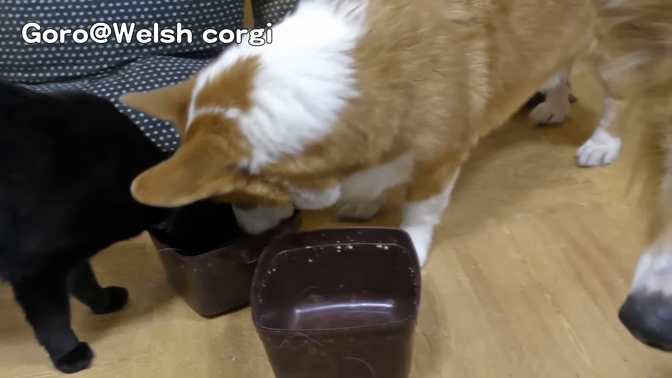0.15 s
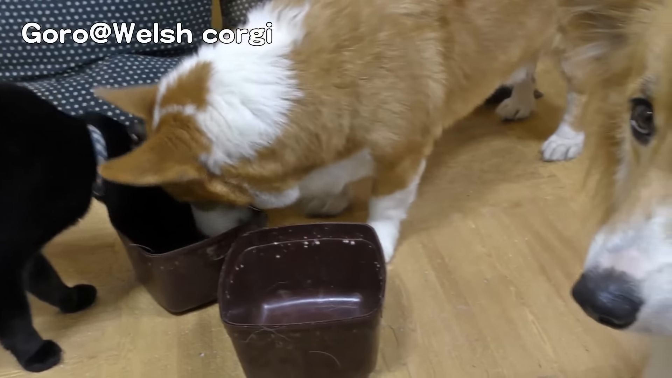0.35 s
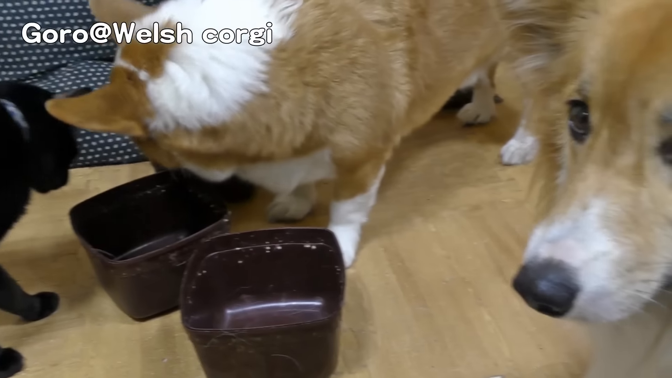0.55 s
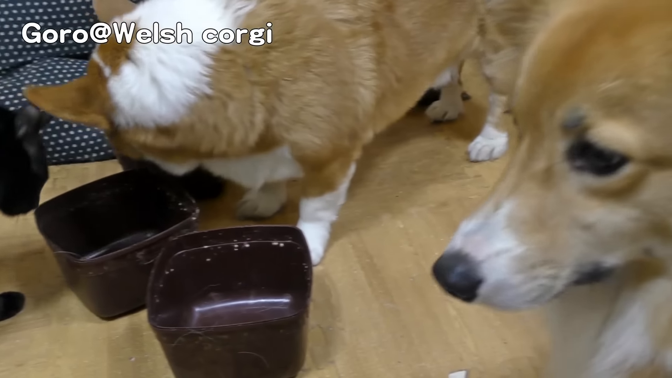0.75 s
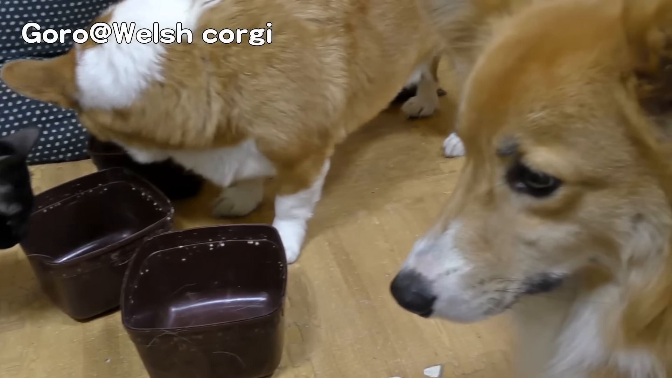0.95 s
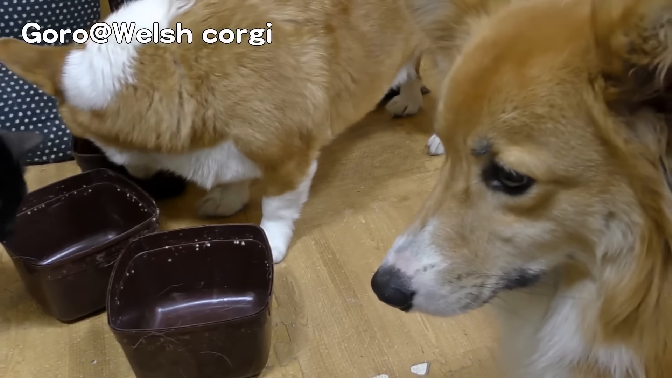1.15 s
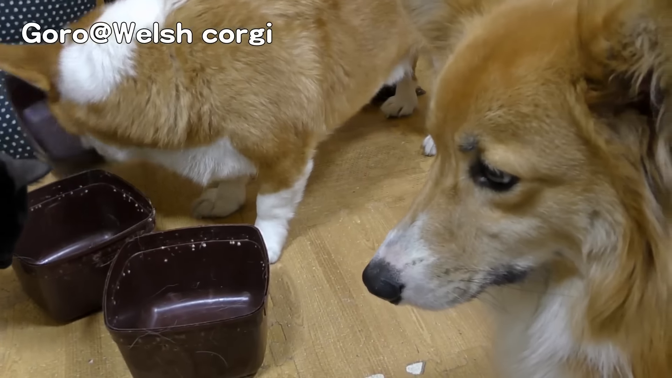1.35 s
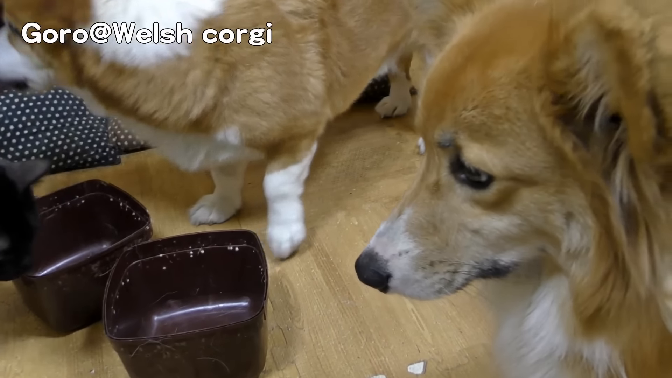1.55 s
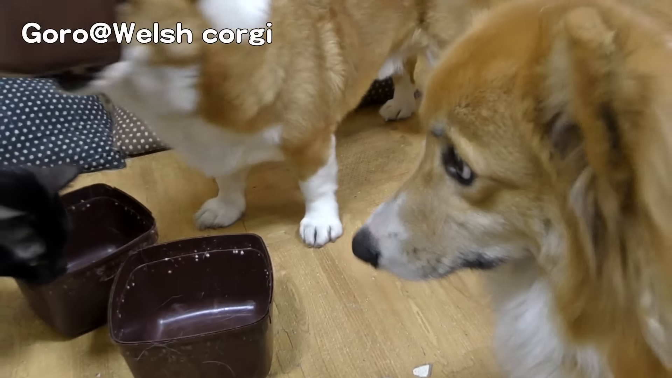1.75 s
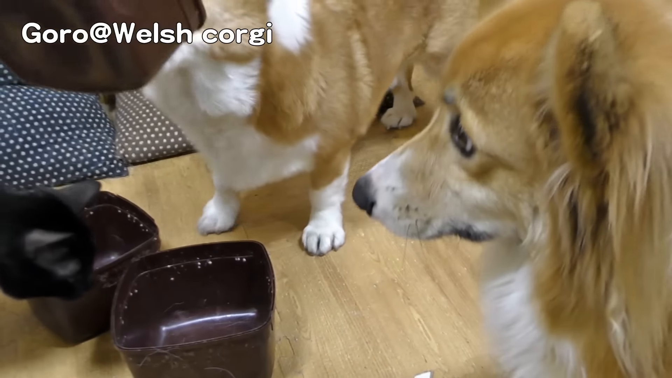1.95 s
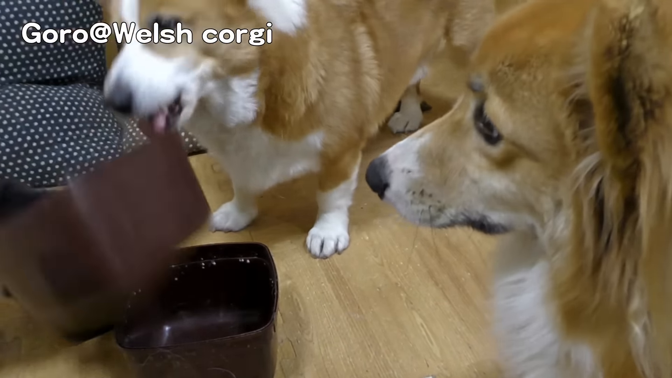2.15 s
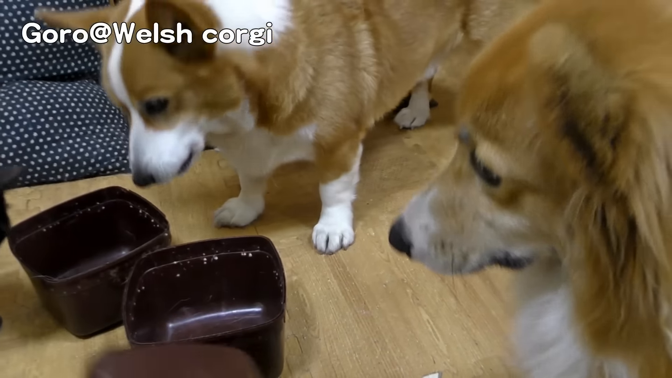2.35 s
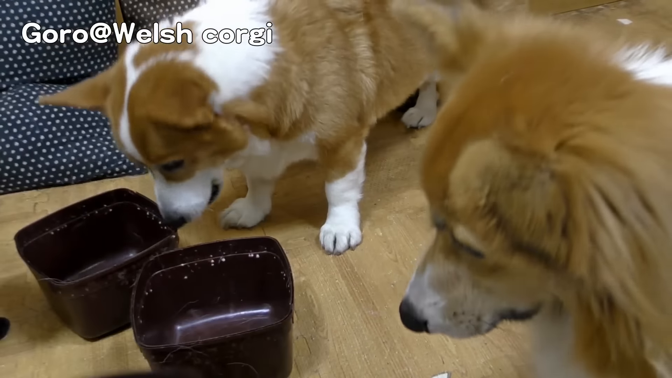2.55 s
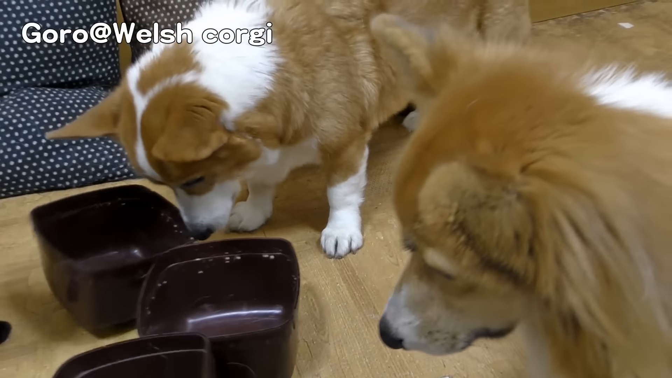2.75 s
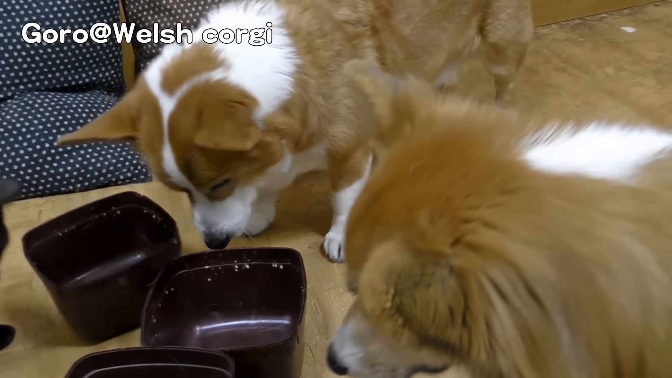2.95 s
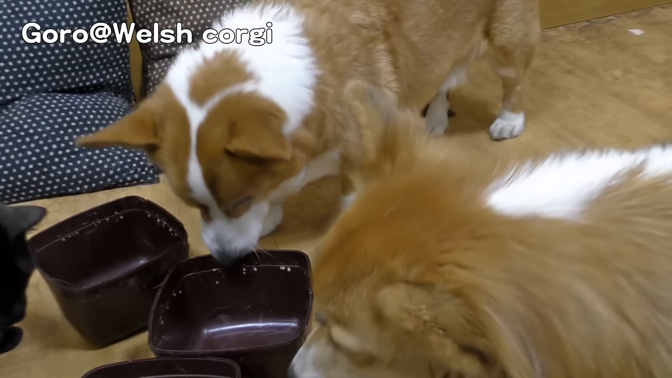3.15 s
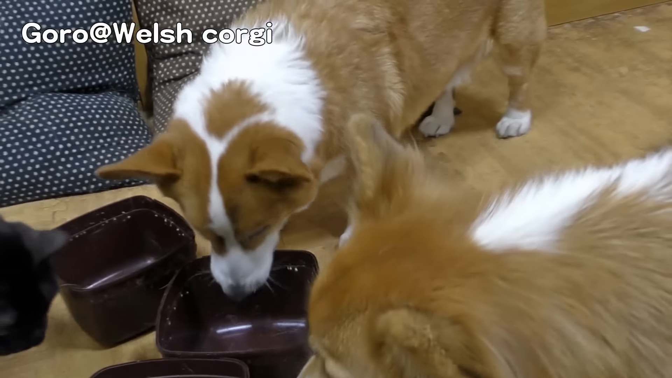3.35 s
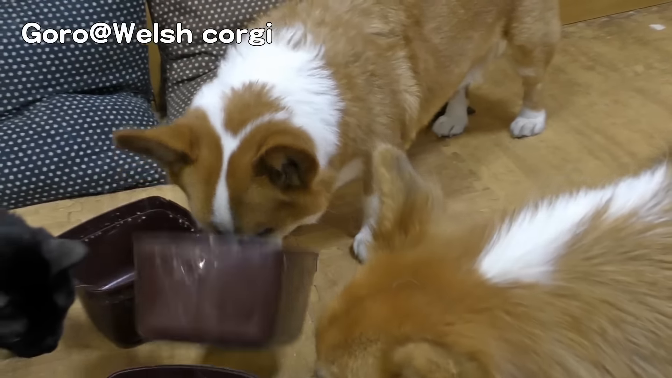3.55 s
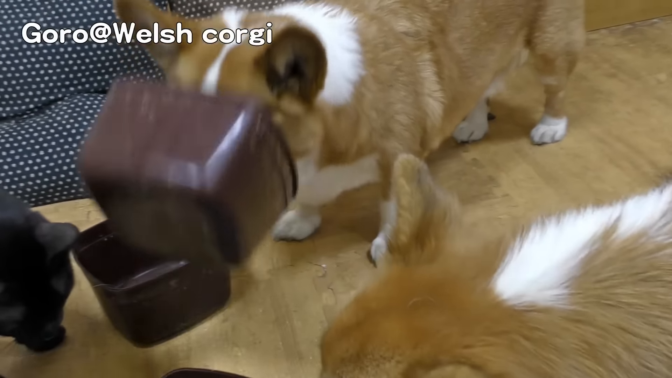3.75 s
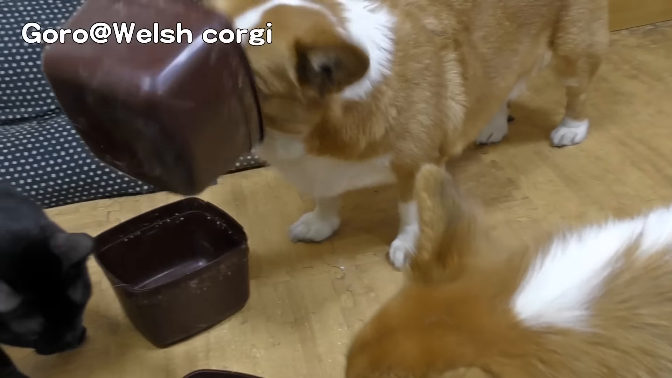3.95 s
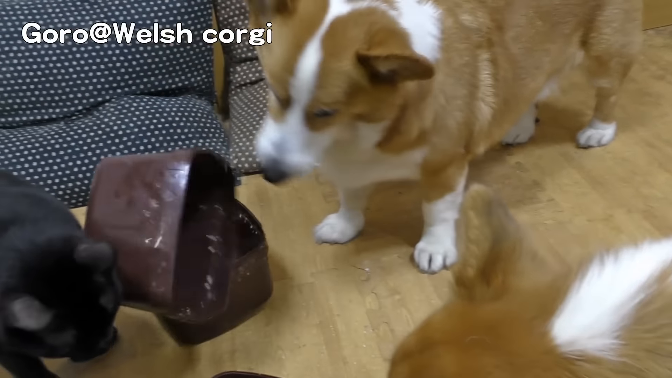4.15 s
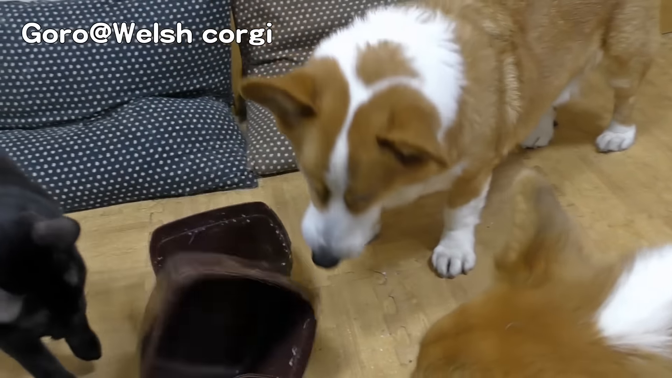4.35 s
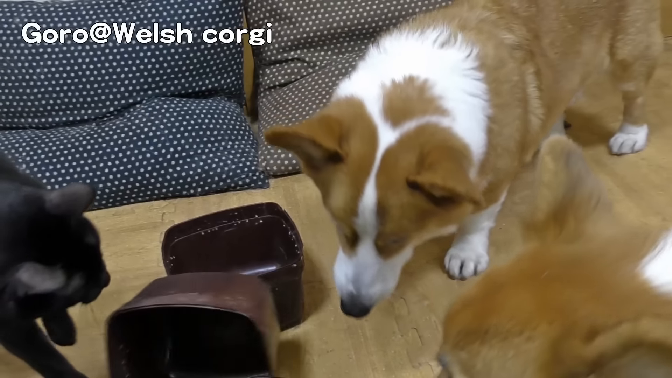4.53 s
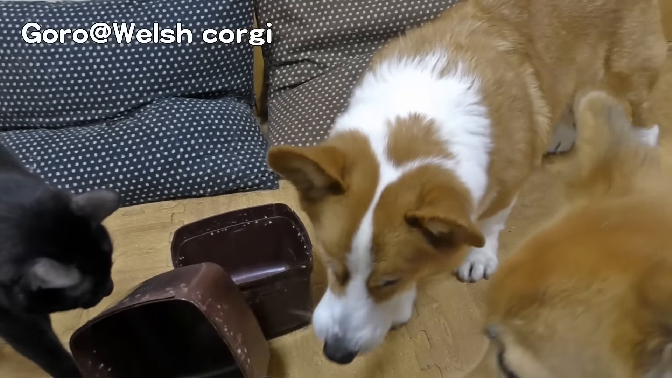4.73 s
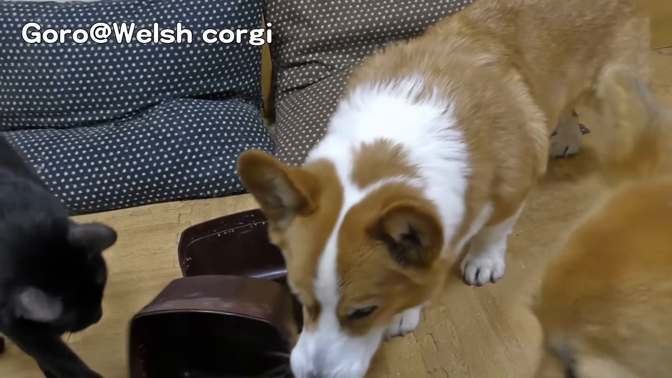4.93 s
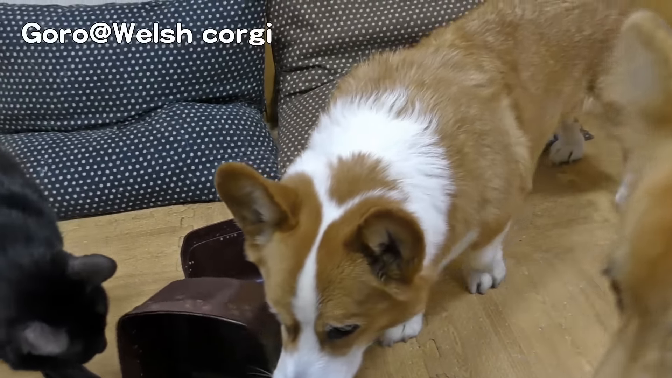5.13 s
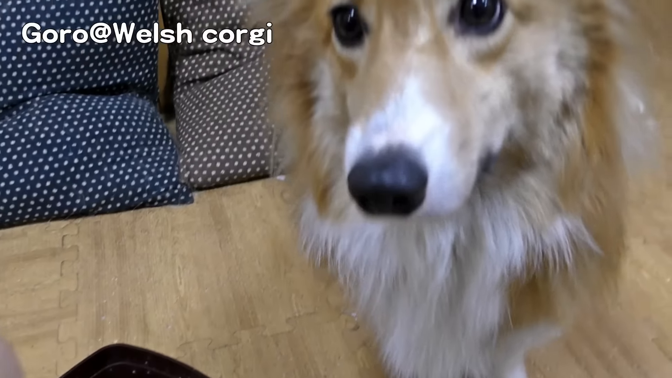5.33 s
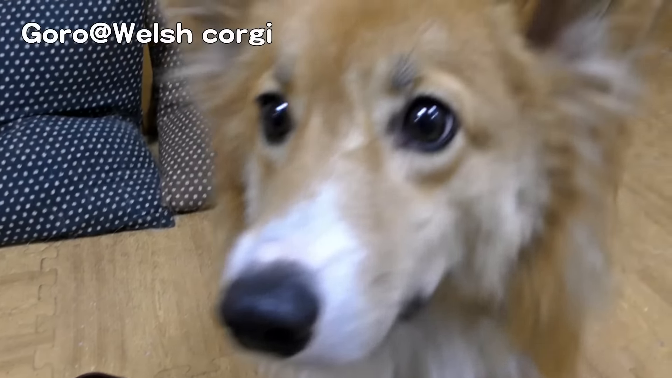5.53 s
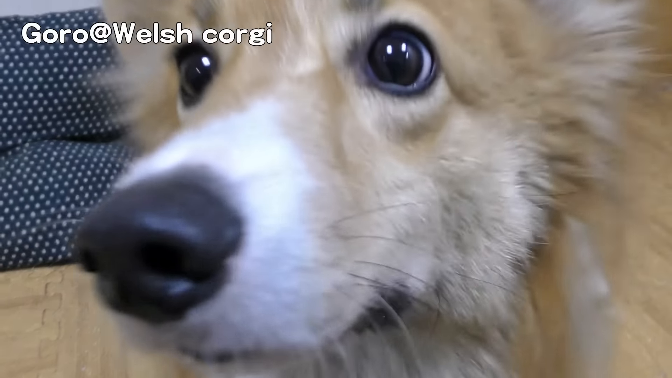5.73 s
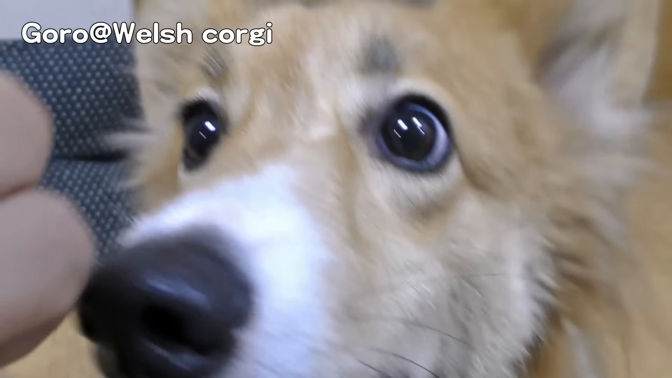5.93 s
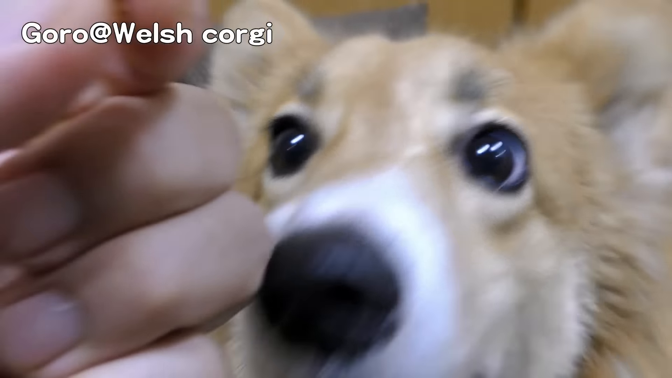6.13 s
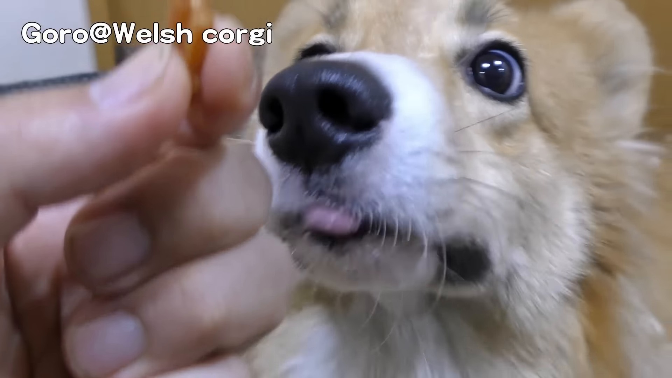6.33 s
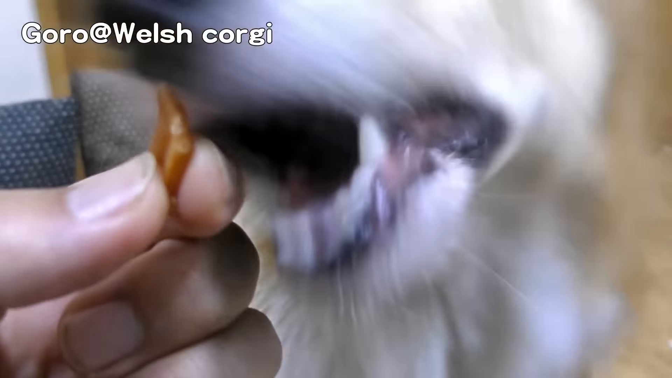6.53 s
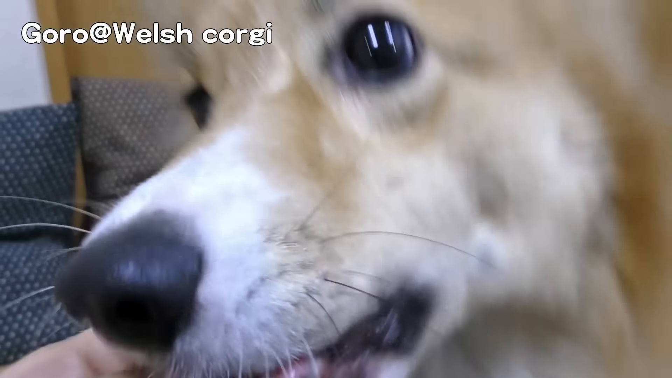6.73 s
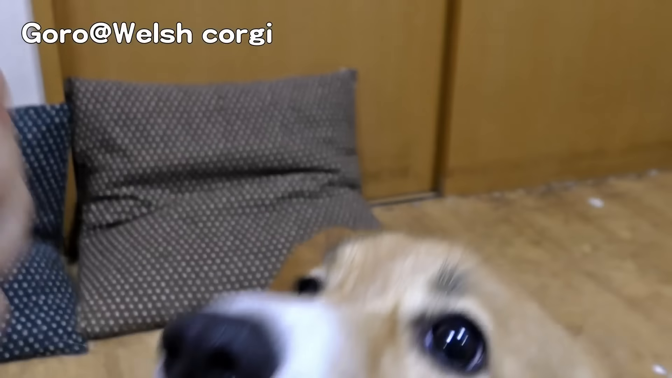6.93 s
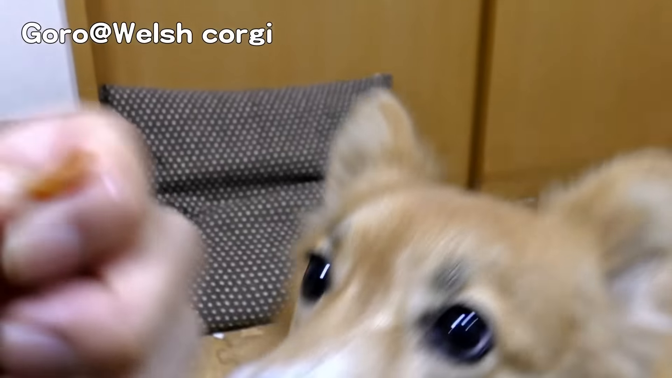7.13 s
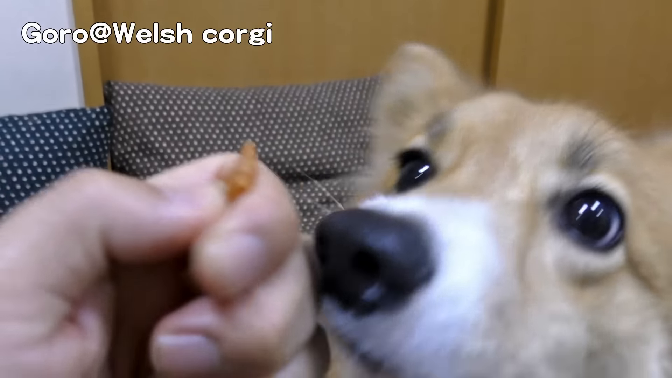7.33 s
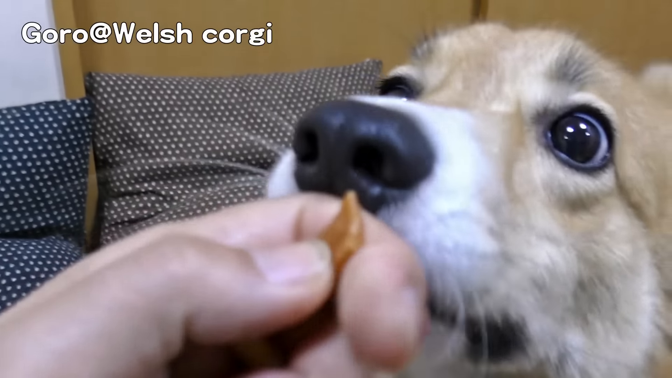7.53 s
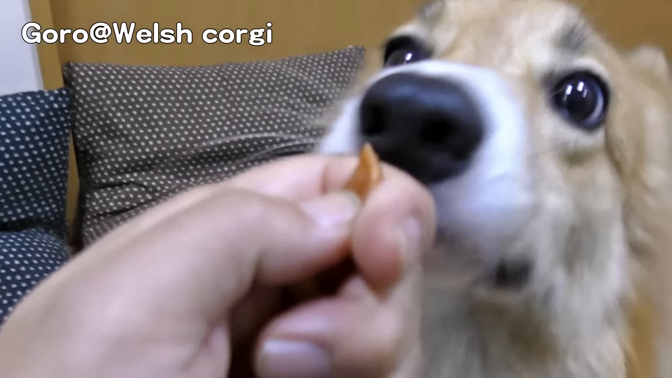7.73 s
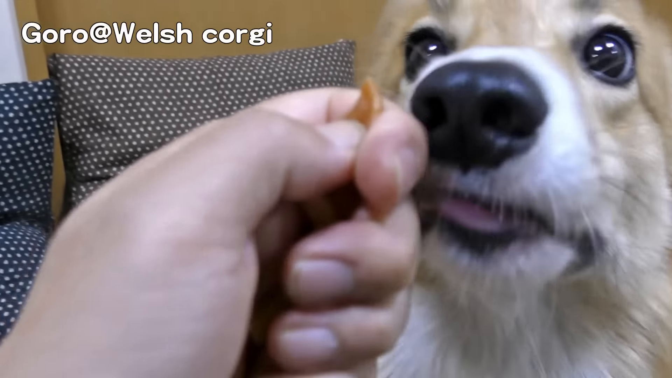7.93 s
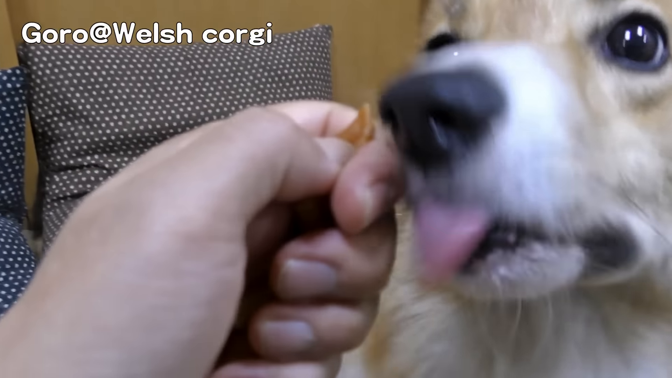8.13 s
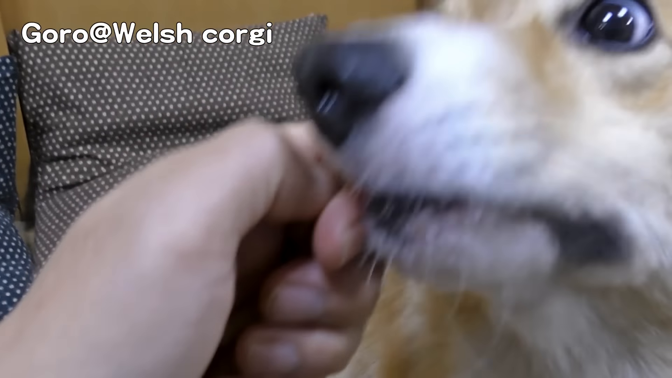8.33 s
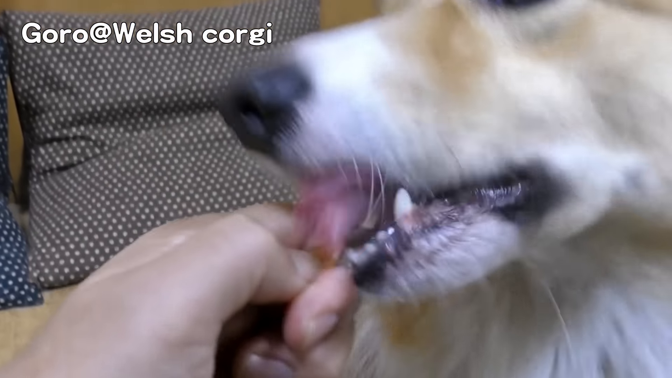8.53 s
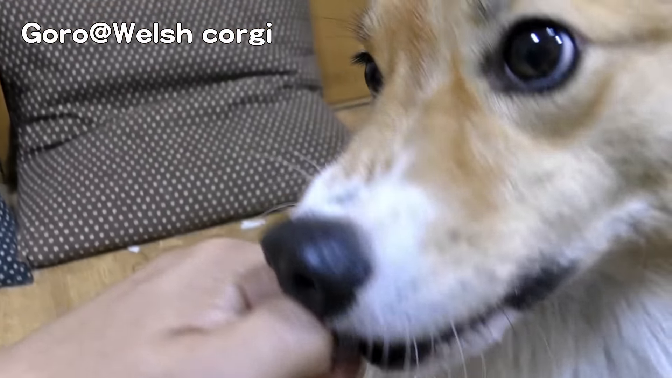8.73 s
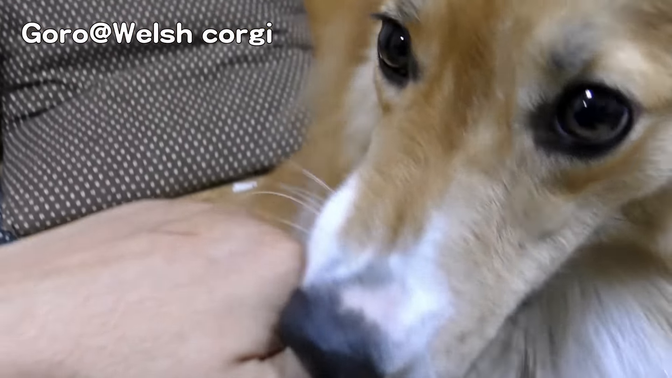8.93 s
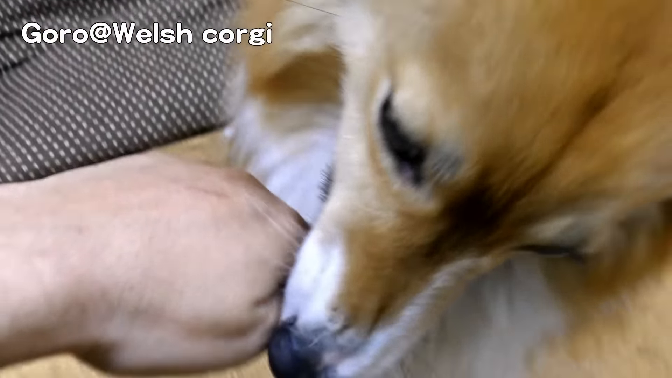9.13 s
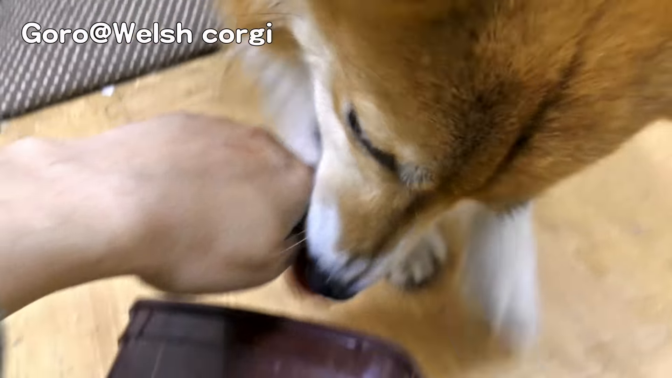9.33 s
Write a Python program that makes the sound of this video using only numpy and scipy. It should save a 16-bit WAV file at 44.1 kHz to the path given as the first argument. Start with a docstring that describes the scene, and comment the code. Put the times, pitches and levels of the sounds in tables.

```python
"""A soft indoor hum with faint hiss, then small clicks and puffs of air as dogs sniff about a small room.
They nose and tip hard plastic boxes on the floor, then take a treat right at the microphone.
Each knock is a short noise crack at the rim, with decaying sines for the thin walls and drum-like bottom.
Sliding boxes are trains of uneven slips, sniffs and fur are shaped noise, and paws are short low thumps.
Teeth, lips and tongues are brief cavity tones with bright ticks; filtered noise tails make the room."""
import sys
import numpy as np
from scipy import signal
from scipy.fft import rfft, irfft, next_fast_len
from scipy.io import wavfile

SR = 44100
rng = np.random.default_rng(int(sys.argv[2]) if len(sys.argv) > 2 else 0)


def to_wav(sig):
    """Store sig (one row per channel, or 1-D mono) as 16-bit WAV at the path in sys.argv[1].

    Samples outside -1..1 are clipped; the rate is SR.
    """
    pcm = np.clip(np.atleast_2d(sig), -1, 1) * 32767
    pcm = np.round(pcm).astype(np.int16)
    wavfile.write(sys.argv[1], SR, pcm.T)  # frames by channels


N = 413658  # samples in the scene
AGE = np.arange(SR // 3) / SR  # seconds since a blow; every struck sound and room tail ends here


def undb(db):
    """Turn decibels into an amplitude factor."""
    return 10 ** (np.asarray(db) / 20)


def level(x, db, span):
    """Scale a sound so that its energy, spread over span seconds, has this level in dB."""
    rms = np.sqrt(np.sum(x ** 2) / (span * SR) + 1e-18)
    return x * undb(db) / rms


def fade(t60):
    """Exponential decay after a blow, falling 60 dB in t60 seconds."""
    return np.exp(-np.log(1000) * AGE / t60)


def add(track, s, x):
    """Mix a sound into a track from time s in seconds."""
    i = int(s * SR)
    track[i:i + len(x)] += x[:N - i]


def band(x, hz, ratio, order=1):
    """Band-pass from hz / ratio to hz * ratio, kept below the top of the sampled range."""
    edges = [hz / ratio, min(hz * ratio, .47 * SR)]
    return signal.sosfilt(signal.butter(order, edges, "band", fs=SR, output="sos"), x)


def highpass(x, hz, order=2):
    """Remove what lies below hz."""
    return signal.sosfilt(signal.butter(order, hz, "high", fs=SR, output="sos"), x)


def noise(points, size):
    """Noise of rms 1, its spectrum drawn through (Hz, dB) points."""
    hz, db = np.transpose(points)
    n = next_fast_len(size)
    f = np.arange(n // 2 + 1) * SR / n
    gain = undb(np.interp(np.log(f + 1), np.log(hz), db))
    x = irfft(rfft(rng.standard_normal(n)) * gain, n)[:size]
    return x / x.std()


def walk(rate, size):
    """Random wander with a spread near 1: straight lines between rate random points per second."""
    steps = np.arange(size) * rate / SR
    count = int(steps[-1]) + 2
    return np.interp(steps, np.arange(count), rng.standard_normal(count))


def spread(mid, side, side_db):
    """Left and right from a common and an opposed part."""
    return mid + undb(side_db) * side * np.array([[1], [-1]])


def crack(t60, rise=0.0014):
    """A burst of contact noise; the surfaces take a moment to meet."""
    return rng.standard_normal(len(AGE)) * fade(t60) * (1 - fade(rise))


# Spectrum of fine contact noise. Each row: frequency in Hz, relative density in dB per Hz.
FINE = [(1500, -70), (4000, 1), (5800, -4.5), (7500, -4), (9800, -1.5), (12000, -5.5), (16000, -22.5)]


def tick(t60):
    """The very short, bright start of a contact."""
    return noise(FINE, len(AGE)) * fade(t60)


def radiated(hz, ratio):
    """A click summed over all directions, as the room hears it: one smooth broad hump."""
    return band(band(signal.unit_impulse(len(AGE)), hz, ratio), 1770, 3.0, order=2)


# Spectrum of the room's air noise. Each row: frequency in Hz, relative density in dB per Hz.
HUM = [(18, -74), (30, -13), (64, -11), (95, -6), (141, -0.5), (252, -11), (287, -9), (473, -17.5),
       (616, -26), (1350, -18.5), (1760, -20.5), (2540, -23), (5590, -38), (9220, -36), (16000, -36)]
HUM_DB = -56


def hum(wander_db=0.5, hiss_db=-74.0):
    """Nearly steady indoor air noise, with a faint independent hiss in each microphone."""
    common = noise(HUM, N) * undb(wander_db * walk(2.19, N))
    air = spread(common, noise(HUM, N), -7.5)
    return undb(HUM_DB) * air + undb(hiss_db) * rng.standard_normal((2, N))


# Fur and hands stirring near the microphone. Each row: time in seconds, rustle level in dB.
STIR = [(5.5, -81), (5.85, -57), (6.25, -61), (6.8, -53.5), (7.12, -64), (7.5, -63.5), (7.9, -58),
        (8.45, -63.5), (8.85, -66), (9.12, -51), (9.37, -56)]
# Spectrum of the fur rustle. Each row: frequency in Hz, relative density in dB per Hz.
FUR = [(150, -4), (400, 1.5), (650, -13), (1100, 0.5), (1700, -1), (3000, -3), (4200, -11), (6000, -28.5),
       (12000, -36)]
# Sniffs, brushing fur and scuffing feet. Each row: start in seconds, length in seconds, level in dB.
SNIFFS = [(.23, 0.068, -61), (1.5, 0.057, -62), (1.683, 0.077, -59), (4.79, 0.051, -54.5),
          (5.058, 0.09, -57), (5.171, 0.074, -56.5), (5.399, 0.053, -56), (5.619, 0.038, -48.5),
          (5.746, 0.047, -53), (5.904, 0.037, -47.5), (5.966, 0.058, -51), (6.361, 0.041, -49),
          (6.445, .05, -52.5), (6.53, 0.044, -45), (6.872, 0.11, -44.5), (7.202, 0.044, -46),
          (7.254, 0.059, -51), (8.295, .08, -55.5), (9.125, .077, -46.5)]
SNIFF_HISS_DB, STIR_HISS_DB = -10, -8  # fine hiss relative to the rustle


def sniffs(flutter_db=6.5, stir_flutter_db=5.0):
    """Short fluttering puffs of air, brushed fur and scuffs as shaped noise over a continuous stirring."""
    stir_db = np.interp(np.arange(N) / SR, *np.transpose(STIR))
    out = undb(stir_db + stir_flutter_db * walk(30, N)) * noise(FUR, N)
    out += undb(stir_db + STIR_HISS_DB + stir_flutter_db * walk(60, N)) * noise(FINE, N)
    for start, length, db in SNIFFS:
        size = int(length * SR)
        swell = signal.windows.tukey(size, .6) * undb(flutter_db * walk(250, size))
        breath = noise(FUR, size) + undb(SNIFF_HISS_DB) * noise(FINE, size)
        add(out, start, level(swell * breath, db, length))
    return out


# Smacks of lips and tongue. Each row: time in seconds, level in dB, mouth resonance in Hz.
SMACKS = [(0.806, -53.5, 1540), (1.0219, -49.5, 1920), (1.703, -48, 1580), (1.736, -47, 1400),
          (6.09, -44.5, 1310), (6.2919, -38, 1370), (6.4439, -44, 1350), (6.587, -32, 1110),
          (6.655, -33.5, 1320), (6.659, -30.5, 1260), (6.942, -38, 1630), (7.0236, -41, 870),
          (7.3189, -38.5, 1220), (7.331, -37, 1410), (7.3671, -39.5, 744), (7.646, -46.5, 2100),
          (7.7282, -42, 820), (7.7507, -41.5, 1300), (7.761, -42.5, 1550), (7.884, -43.5, 1420),
          (7.976, -41.5, 1175), (8.1134, -39, 920), (8.125, -40, 1180), (8.2238, -45, 1150),
          (8.2701, -46, 1280), (8.3954, -33, 1360), (8.5895, -47, 1310), (8.6761, -39, 1180)]
# Jaw thud (at the usual mouth pitch), wet tick and room send, in dB relative to the smack.
JAW_DB, WET_DB, SMACK_ROOM_DB = -6, -17, -17
# The jaw thuds harder when the mouth is wide and rings low.
JAW_DB_PER_OCT, USUAL_MOUTH_HZ = -13.5, 1250
# Sharp snaps of teeth, claws and box edges.
# Each row: time in seconds, level in dB, ringing pitch in Hz, bright tick level in dB.
SNAPS = [(0.219, -56, 1080, -59), (0.456, -52.5, 2450, -50), (0.6226, -72, 3100, -55),
         (0.7855, -65, 2900, -51), (1.238, -55, 3000, -44.5), (2.2875, -56, 3600, -26),
         (5.6161, -27.5, 4330, -33), (6.5678, -31, 1400, -37), (6.6588, -41, 3080, -36),
         (6.807, -44.5, 2800, -47.5), (6.8545, -17.5, 2710, -29), (7.3675, -65, 3000, -49.5),
         (7.5996, -69, 5200, -36), (7.9028, -63, 4970, -38), (7.9566, -35, 3780, -50),
         (8.0195, -40.5, 2900, -47.5)]
SNAP_THUD_DB, SNAP_ROOM_DB = -20.5, -11  # thud relative to the snap; room send


def smacks_and_snaps(smack_db=-3):
    """A small cavity rings for a few cycles, with a bright tick and a small thud; returns direct and room send."""
    direct, sent = np.zeros((2, N))
    events = []
    for s, db, hz in SMACKS:
        jaw_db = db + JAW_DB + JAW_DB_PER_OCT * np.log2(hz / USUAL_MOUTH_HZ)
        events.append((s, db, hz, jaw_db, db + WET_DB, SMACK_ROOM_DB))
    for s, db, hz, tick_db in SNAPS:
        events.append((s, db, hz, db + SNAP_THUD_DB, tick_db, SNAP_ROOM_DB))
    for s, db, hz, thud_db, tick_db, room_db in events:
        # balance tone and noise against each other, then set the level of both together
        cavity = level(np.sin(2 * np.pi * hz * AGE) * fade(22 / hz), 0, 1)
        burst = level(band(crack(0.014), hz, 1.5, order=2), smack_db, 1)
        body = level(highpass(cavity + burst, 250), db, 0.0076)
        thud = level(band(crack(0.049), 330, 1.35, order=2), thud_db, 0.007)
        bright = level(tick(0.011), tick_db, 0.0047)
        add(direct, s, body + thud + bright)
        add(sent, s, undb(room_db) * (level(radiated(hz, 1.7), db, 0.0074) + thud + bright))
    return np.array([direct, sent])


# Modes of a plastic box. Each row: frequency in Hz, relative level in dB, 60 dB decay time in seconds
# before any extra damping.
BOX = [(115, -2.5, 0.047), (150.8, -9.5, 0.17), (183.7, -1, 0.13), (255.7, 14, 0.051), (308, 6, 0.047),
       (313, -3, 0.089), (331, 1, 0.082), (408.6, 5, 0.065), (437, -5.5, 0.29), (487, 2.5, 0.099),
       (517, -4.5, 0.19), (694, 2, 0.14), (1074, 18, 0.08), (1288, 14, 0.12), (1357, 7, 0.066),
       (1453, 15.5, 0.05), (1770, -6, 0.021), (1995, 7, 0.024), (3150, 39, 0.014), (3400, -7, .025),
       (5350, -50, .015)]
BOTTOM_TOP_HZ, WALL_TOP_HZ = 220, 800  # bottom modes lie below the first, wall modes between, rim above


def ring(lo_hz, hi_hz, spot_hz, octaves, damping, scatter_db=2.5, detune=0.0094):
    """The box modes in a range; the struck spot favours those near spot_hz, and grip shifts them a little."""
    out = 0
    for hz, db, t60 in BOX:
        size, shift = rng.standard_normal(2)
        if lo_hz <= hz < hi_hz:
            distance = np.log2(hz / spot_hz) / octaves
            weight = undb(db + scatter_db * size) / (1 + distance ** 2)
            tone = np.sin(2 * np.pi * hz * (1 + detune * shift) * AGE)
            out = out + rng.choice([-1, 1]) * weight * tone * fade(t60 / damping)
    return out


def chatter(x, bounce_db=-16, gap=.004, count=3):
    """The light plastic rattles a few times on the floor after a blow, each time weaker."""
    out = x.copy()
    lags = np.cumsum(gap * rng.uniform(0.63, 3.8, count))
    for k, lag in enumerate(lags):
        out += np.roll(x, int(lag * SR)) * undb(bounce_db) / (k + 1)
    return out


# Box knocks. Each row: time in seconds, bottom level in dB, wall level in dB, wall pitch in Hz favoured
# by the struck spot, clack level in dB, clack pitch in Hz.
KNOCKS = [(1.155, -43.5, -46.5, 302, -53.5, 1890), (1.2175, -46, -28.5, 278, -41.5, 1300),
          (1.238, -67, -32, 303, -45.5, 1900), (1.305, -68, -39.5, 350, -48, 1390),
          (1.4362, -61, -49.5, 414, -46.5, 1140), (2.108, -29.5, -32.5, 400, -31, 2250),
          (2.1943, -49, -60, 270, -37, 2300), (2.287, -41, -24.5, 355, -26.5, 1390),
          (2.312, -29.5, -27.5, 328, -28, 2270), (2.406, -29.5, -26.5, 426, -27, 1800),
          (2.6122, -27.5, -35, 294, -27, 2010), (2.748, -44, -39, 446, -34.5, 1880),
          (2.756, -42, -29, 381, -21.5, 2120), (2.8304, -40, -27, 294, -27, 2140),
          (2.954, -51, -31.5, 271, -36.5, 1620), (2.9789, -47, -39, 297, -37.5, 2440),
          (3.026, -41, -36, 349, -35, 2020), (3.1398, -46.5, -41, 310, -39.5, 1930),
          (3.3749, -48, -38, 313, -43.5, 1590), (3.4003, -52, -29, 335, -33.5, 2580),
          (3.4694, -64, -45, 347, -45, 2400), (3.543, -64, -42, 343, -38.5, 2120),
          (3.611, -57, -38.5, 373, -39.5, 1390), (3.7684, -41.5, -35.5, 293, -36.5, 1700),
          (3.991, -34.5, -38.5, 440, -37, 1590), (4.181, -40, -26, 340, -22, 2150),
          (4.1809, -58, -30, 614, -24, 1080), (4.3434, -41.5, -46, 252, -48, 1730),
          (4.418, -17.5, -33, 298, -27.5, 1850), (4.442, -42, -31.5, 249, -62, 2250),
          (4.5256, -33.5, -36, 350, -36, 1700), (4.5896, -43.5, -47, 300, -49, 1800),
          (4.641, -41.5, -34, 377, -39, 1700), (4.6934, -42.5, -43, 324, -36.5, 1800)]
# Light knocks are mostly room, hard ones stand out dry: clack level in dB where this adds no change
# to the room send, and dB of room per dB of clack.
ROOM_EVEN_DB, ROOM_SLOPE = -41, -0.42
# The hard knock near 4.18 s is dry, with little room tail: time span in seconds, room change in dB.
DRY_SPAN_S, DRY_ROOM_DB = (4.0, 4.3), -11.5
# The bright edge tick keeps step with the clack, and grows with its pitch (a harder contact).
EDGE_DB, EDGE_DB_PER_OCT, USUAL_CLACK_HZ = -14.5, 8.5, 1900


def knocks(body_room_db=-14, clack_room_db=-1, rim_db=-5.0, flex_db=1, flex_t60=0.044):
    """Rim crack, wall flex and bottom boom; returns the direct sound and what goes into the room."""
    direct, sent = np.zeros((2, N))
    for s, bottom_db, wall_db, wall_hz, clack_db, clack_hz in KNOCKS:
        is_dry = DRY_SPAN_S[0] < s < DRY_SPAN_S[1]
        room_db = ROOM_SLOPE * (clack_db - ROOM_EVEN_DB) + is_dry * DRY_ROOM_DB
        edge_db = clack_db + EDGE_DB + EDGE_DB_PER_OCT * np.log2(clack_hz / USUAL_CLACK_HZ)

        # the bottom takes a few milliseconds to get going
        boom = ring(0, BOTTOM_TOP_HZ, 165, 1.6, 1.0) * (1 - fade(0.051))
        bottom = level(highpass(boom, 95), bottom_db, 0.045)

        # the wall gives way under the blow, then rings on in its modes; a small panel radiates little bass
        flex = level(np.sin(2 * np.pi * wall_hz * AGE) * fade(flex_t60), flex_db, 0.021)
        modes = level(ring(BOTTOM_TOP_HZ, WALL_TOP_HZ, wall_hz, 0.41, 0.95), 0, 0.025)
        wall = level(highpass((flex + modes) * (1 - fade(0.004)), 118), wall_db, 0.029)

        contact = band(band(crack(0.0096), clack_hz, 1.15), 1450, 3.35, order=2)
        clack = chatter(level(contact, clack_db, 0.0061))
        rim_modes = ring(WALL_TOP_HZ, SR, clack_hz, .5, 1.0, detune=.02)
        rim = level(rim_modes, clack_db + rim_db, .006)
        edge = level(tick(0.013), edge_db, 0.0059)
        add(direct, s, bottom + wall + clack + rim + edge)

        bright = level(radiated(clack_hz, 1.97), clack_db, 0.0033) + edge
        add(sent, s, undb(body_room_db) * (bottom + wall) + undb(room_db + clack_room_db) * bright)
    return np.array([direct, sent])


# Plastic sliding. Each row: start in seconds, end in seconds, rasp level in dB, rasp pitch in Hz,
# grit level in dB, wall level in dB.
SCRAPES = [(2, 2.131, -44.5, 1840, -59, -56), (3.102, 3.136, -44, 2140, -60, -46),
           (3.461, 3.555, -53.5, 2330, -56.5, -54), (3.528, 3.619, -50, 2160, -47.5, -45.5),
           (3.843, 3.96, -58.5, 1070, -74, -52), (3.992, 4.035, -51.5, 2600, -60, -45),
           (4.644, 4.668, -41.5, 3550, -65, -36.5), (9.207, 9.271, -37, 1420, -56, -47.5)]


def scrapes(slip_rate=450, spread_db=5):
    """Stick and slip: uneven little blows, slip_rate a second, rasp in the rim and shake the walls."""
    out = np.zeros(N)
    for start, end, rasp_db, hz, grit_db, wall_db in SCRAPES:
        span = end - start
        size = int(span * SR)
        happens = rng.random(size) < slip_rate / SR
        force = undb(spread_db * np.minimum(rng.exponential(size=size), 3))
        slips = happens * force * rng.choice([-1, 1], size)
        slips = (slips + 0.29 * rng.standard_normal(size)) * signal.windows.tukey(size, .5)
        # the pressure on the box comes and goes
        slips = slips * undb(5.0 * walk(122.0, size))
        rasp = band(band(slips, hz, 1.4), 1780, 2.0, order=3)
        grit = signal.fftconvolve(slips, tick(0.0027))
        wall_modes = ring(BOTTOM_TOP_HZ, WALL_TOP_HZ, 224, 1.0, 6.7)
        walls = highpass(signal.fftconvolve(slips, wall_modes), 135)
        for part, part_db in (rasp, rasp_db), (grit, grit_db), (walls, wall_db):
            add(out, start, level(part, part_db, span))
    return out


# Soft thumps of paws and bodies. Each row: time in seconds, level in dB, pitch in Hz.
PAWS = [(5.644, -45.5, 260), (5.762, -43, 124), (6.38, -46, 119), (6.46, -46.5, 137), (6.931, -28.5, 127),
        (6.942, -30, 145), (6.999, -39, 203), (7.22, -41, 117), (9.27, -43.5, 151)]


def paws(pad_db=-9):
    """A padded blow: a few low cycles and a dull patter."""
    out = np.zeros(N)
    for s, db, hz in PAWS:
        cycles = np.sin(2 * np.pi * hz * AGE) * fade(0.05) * (1 - fade(0.0088))
        thump = level(cycles, db, 0.032)
        patter = level(band(crack(0.029), 278, 1.31, order=2), db + pad_db, 0.045)
        add(out, s, thump + patter)
    return out


def licks(count=60, wet_db=-58, spread_db=4):
    """Tiny saliva clicks, short noise bursts, while the dog works the treat out of the fingers."""
    out = np.zeros(N)
    for when, pitch, size in rng.random((count, 3)):
        click = band(crack(0.0094), 1400 * 7 ** pitch, 2.3)
        click_db = wet_db + spread_db * min(-np.log(size), 3)  # mostly faint, a few stronger
        add(out, 7.55 + 1.2 * when, level(click, click_db, 0.0026))
    return out


# Room decay. Each row: frequency in Hz, 60 dB decay time in seconds.
ROOM = [(100, 0.39), (400, 0.33), (1500, .32), (4000, 0.2), (9000, 0.25), (16000, 0.26)]


def room(x, side_db=-7, onset=0.0093):
    """Dense reflections of a small furnished room: octave bands of noise, each with its own decay."""
    hz, t60 = np.transpose(ROOM)
    tails = []
    for _ in range(2):
        tail = np.zeros(len(AGE))
        for f in 110 * 2. ** np.arange(8):
            octave = band(rng.standard_normal(len(AGE)), f, np.sqrt(2), order=2)
            tail += octave * fade(np.interp(np.log(f), np.log(hz), t60))
        # reflections build up over the first milliseconds
        tail = tail * (1 - np.exp(-(2 * AGE / onset) ** 2))
        tails.append(signal.fftconvolve(x, tail / np.sqrt(np.sum(tail ** 2)))[:N])
    return spread(*tails, side_db)


def scene():
    """Hard and soft sounds close to a two-port microphone, in the room."""
    direct, sent = knocks() + smacks_and_snaps()
    soft = sniffs() + paws() + licks()
    sliding = scrapes()
    near = direct + soft + sliding
    # a faint 2.2 ms delayed copy, its bass thinned, is added with opposite sign left and right
    delayed = highpass(np.roll(near, int(.0022 * SR)), 300, order=1)
    into_room = sent + undb(-7.5) * soft + undb(-8) * sliding
    return hum() + spread(near, delayed, -15.5) + room(into_room)


TOP_HZ = 16400


def record(dry):
    """The recorder thins the deepest bass and cuts what lies above TOP_HZ."""
    dry = highpass(dry, 35, order=1)
    return signal.sosfilt(signal.ellip(8, .2, 70, TOP_HZ, fs=SR, output="sos"), dry)


dry = scene()
out = record(dry)
to_wav(out)
```